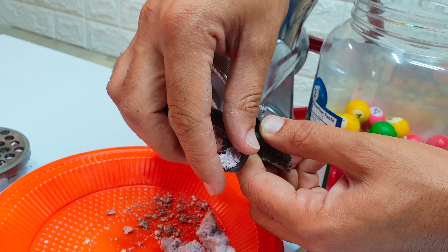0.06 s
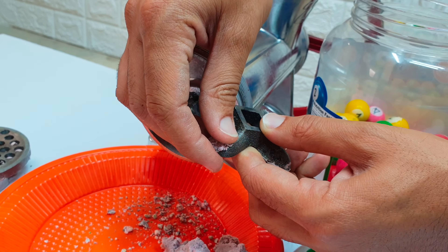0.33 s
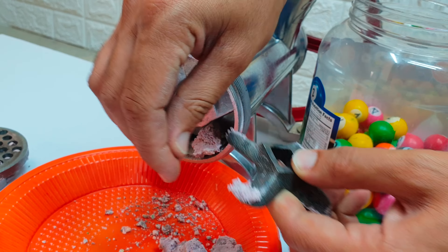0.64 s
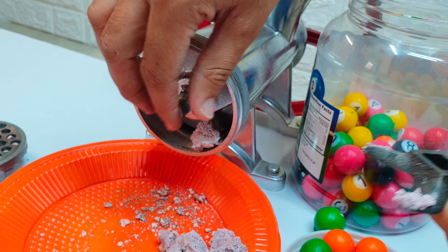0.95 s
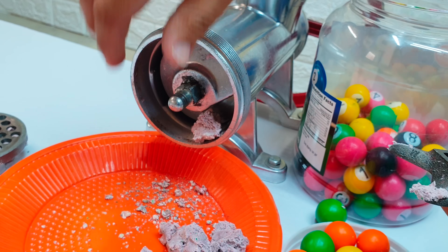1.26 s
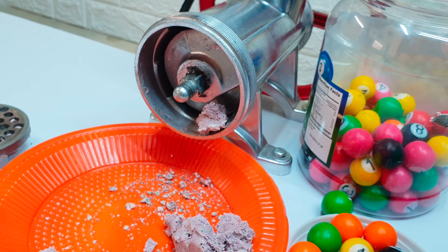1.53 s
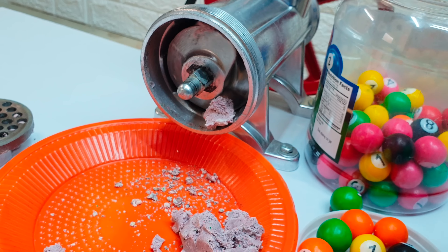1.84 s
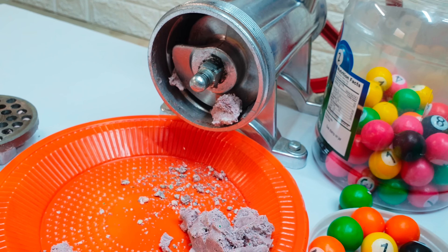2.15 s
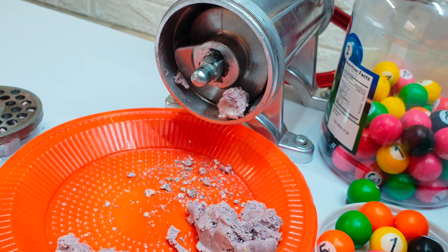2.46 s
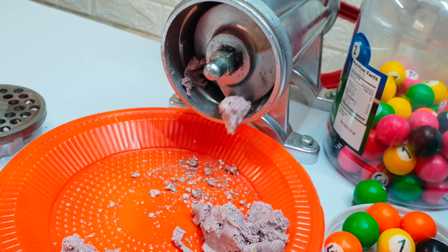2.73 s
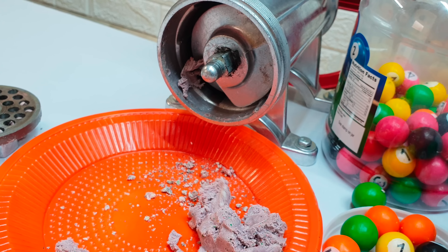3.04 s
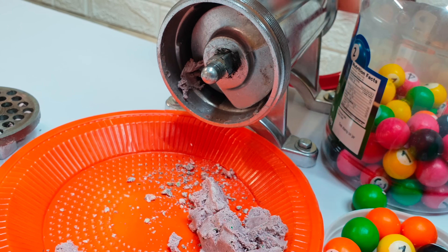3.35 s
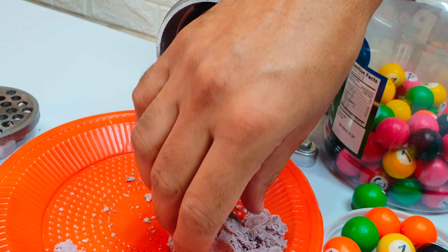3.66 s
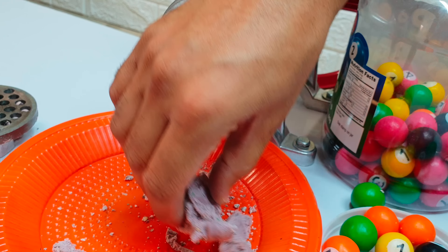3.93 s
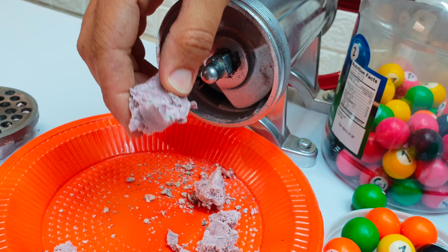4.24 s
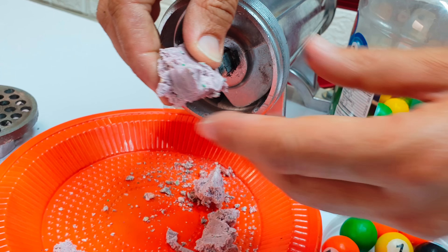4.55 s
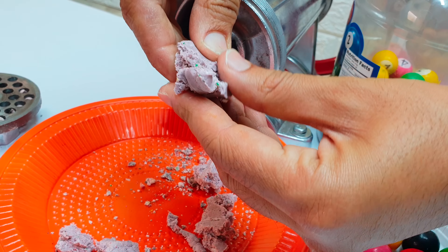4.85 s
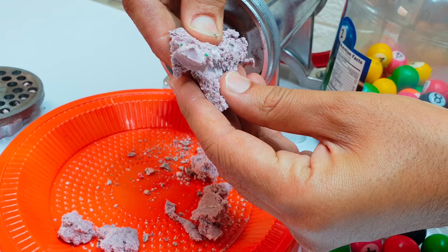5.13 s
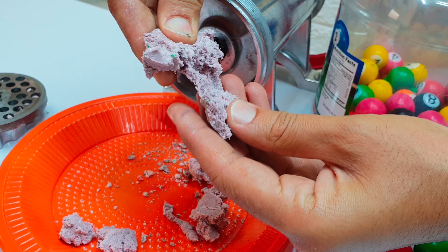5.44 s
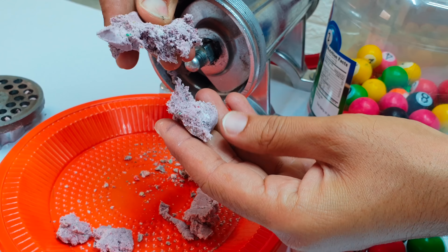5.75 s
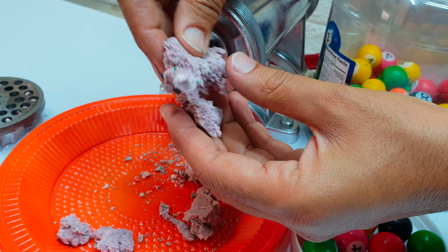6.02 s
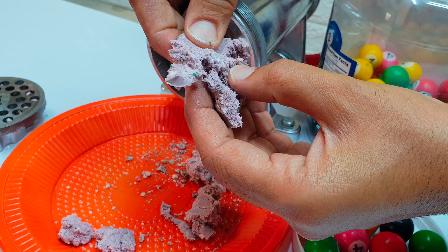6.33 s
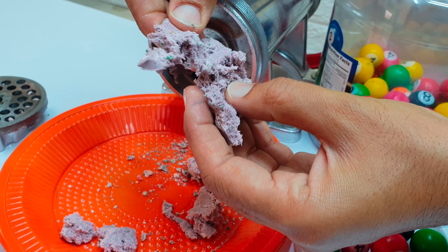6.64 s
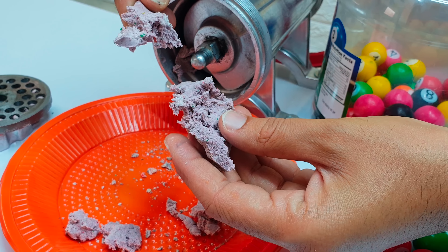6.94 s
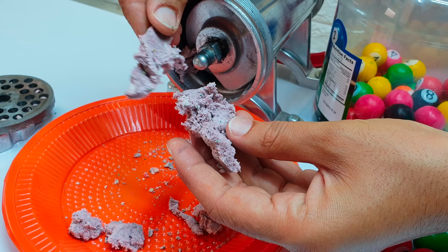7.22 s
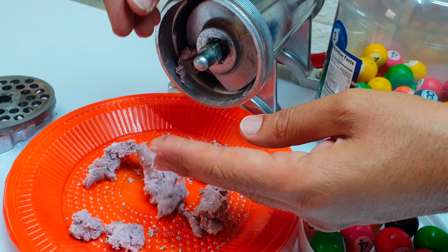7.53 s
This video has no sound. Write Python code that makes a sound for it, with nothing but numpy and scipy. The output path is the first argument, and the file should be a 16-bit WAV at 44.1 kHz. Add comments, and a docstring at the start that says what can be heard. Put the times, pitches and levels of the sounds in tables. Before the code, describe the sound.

Close up on a table in a small room, a blade ticks quietly off a hand grinder. The crank turns and steel rattles, grates and rings loudly in the hollow barrel. Two hollow knocks on a plastic plate follow, then faint snaps of sticky candy tearing and a light thud as it drops. An appliance hums softly throughout.

```python
"""A hand meat grinder has its blade pulled off and is cranked: the loose steel auger clanks and scrapes.
Fingers then knock a plastic plate while picking up soft candy, pull the sticky lump apart and drop it.
All of it happens on a table in a small hard room, with an appliance humming in the background.
The stereo microphone is close enough for direct sound to lead the room; its right port is muffled."""
import sys
import numpy as np
from scipy import signal
from scipy.fft import rfft, irfft, next_fast_len
from scipy.io import wavfile
from scipy.ndimage import map_coordinates

SR = 44100
rng = np.random.default_rng(int(sys.argv[2]) if len(sys.argv) > 2 else 0)


def generate_wav(sig):
    """Save sig (samples, or channels by samples) to the path in sys.argv[1] as 16-bit PCM at SR."""
    pcm = np.round(np.clip(np.atleast_2d(sig).T, -1, 1) * 32767).astype(np.int16)
    wavfile.write(sys.argv[1], SR, pcm)


N = 334278

# the appliance's steady tones: pitch_hz, level_db
HUM_TONES = [(96.9, -65), (193.8, -66), (484.5, -75.5), (532.9, -74.5), (775.2, -81.5), (1884, -70.5),
             (2374, -80.5), (3768, -83), (5044, -91.5), (5652, -92), (5916, -90)]
# its low drone swelling and sinking: time_s, level_db
DRONE_LEVELS = [(0.0, -47), (0.11, -48), (0.29, -64), (0.62, -51.7), (0.81, -58.5), (1.02, -47.5),
                (1.26, -62), (1.52, -52), (3.07, -56.5), (3.15, -80), (3.33, -56), (4.44, -51), (4.82, -55),
                (4.85, -81), (5.11, -63), (5.3, -55.5), (7.19, -58), (7.57, -51)]
# spectrum of the room's air: frequency_hz, relative_db
AIR_SPECTRUM = [(25, -18.5), (45, -10), (90, -15), (150, -12.5), (270, -19.5), (530, -30), (900, -31.5),
                (1400, -46.5), (1900, -32), (2150, -43), (3100, -41.5), (3750, -34.5), (4400, -48),
                (5750, -43), (7000, -63), (16000, -50.5)]
# skin and candy sliding over metal and plastic: start_s, rise_s, hold_s, level_db
FINGER_RUBS = [(0, 0.003, .02, -60.5), (0.66, 0.19, 0.19, -64.5), (2.4, .15, 0.38, -61),
               (3.42, 0.032, .01, -79.5), (3.73, 0.023, 0.23, -61.5), (4.2, .2, 0.09, -67)]
# spectrum of a rub: frequency_hz, relative_db
SKIN_SPECTRUM = [(600, -23), (2000, -7.5), (4500, -2), (6000, -8), (7500, -16), (10000, -6.5),
                 (12000, -12.5), (16000, -28)]
# the sticky blade clicking as it comes off, then candy tearing: start_s, level_db, tilt_db_per_octave
STICKY_CLICKS = [(0.052, -52, -13), (0.060, -54.5, -3), (0.099, -53, -17), (0.318, -51, -7.5),
                 (2.907, -49, 1.5), (3.126, -64.5, -10), (3.761, -48.5, -3), (3.81, -51, -0.5),
                 (3.84, -47.5, -3), (3.914, -51.5, -16), (4.013, -39.5, -0.5), (4.810, -41.5, -7),
                 (5.464, -58, -7), (5.478, -49, -1.5), (5.493, -54, -23.5), (5.8768, -56, 1),
                 (5.934, -61.5, -4), (6.087, -62.5, -4), (6.753, -52.5, 6), (7.529, -36, -2),
                 (7.547, -39, -4.5), (7.571, -37, -0.5)]
# spectrum of a click or snap: frequency_hz, relative_db
SNAP_SPECTRUM = [(300, -44.5), (900, -23), (1500, -13), (2500, -7.5), (3600, -4.5), (5000, -5), (6100, -3),
                 (7500, -15.5), (9800, -7.5), (12000, -10), (16000, -27)]
# steel grating as the blade is pulled off, then as the crank turns: start_s, rise_s, hold_s, level_db
BARREL_SCRAPES = [(0.115, 0.05, 0.038, -49), (1.68, .03, 0.18, -40), (1.91, 0.063, 0.028, -31.5),
                  (2.31, 0.072, 0.34, -51.5), (2.605, 0.028, .18, -36.5), (2.85, .05, 0.14, -58.5)]
# dense clatter of grinder and table: frequency_hz, relative_db
CLATTER_SPECTRUM = [(24, -51), (45, -7), (125, -6.5), (210, -3.5), (520, -2), (1330, -8.5), (1620, -17.5),
                    (2050, -14.5), (2900, -14), (3600, -27), (5400, -26.5), (7700, -46.5), (9900, -31.5),
                    (16000, -54)]
# resonances of the hollow barrel: centre_hz, width_hz, gain_db
BARREL_RESONANCES = [(526, 23, 4), (1360, 57, 7), (1965, 465, 5.5), (4200, 180, 11.5), (5070, 170, 4.5)]
# loose steel striking the barrel: start_s, level_db, tilt_db_per_octave, bass_db
STEEL_STRIKES = [(0.122, -44, -3.5, -26), (0.204, -48, 2, -5), (0.222, -43, -0.5, 8.5),
                 (1.697, -51, 12, 14.5), (1.720, -30, -9, 10), (1.7487, -14.5, 0.5, -4),
                 (1.758, -17, 0, -5.5), (1.8306, -13.5, 2.5, 10.5), (2.0169, -22, 0.5, -1.5),
                 (2.1219, -23.5, -1.5, -5), (2.236, -30.5, -2.5, -2.5), (2.4267, -34, -13.5, -3),
                 (2.625, -33.5, -0.5, 2), (2.633, -27.5, -0.5, 9.5), (2.680, -27, -0.5, -6),
                 (2.690, -18.5, 0, -5.5), (2.7756, -22.5, -1.5, -7), (2.8071, -23.5, -1.5, -17.5)]
# ringing modes of grinder and table: pitch_hz, relative_db, t60_s
GRINDER_MODES = [(210.5, 1.5, 0.64), (280, -7, 0.424), (331, 2, 0.55), (471, 1.5, 0.344), (532, 1, .65),
                 (667.5, 0.5, .45), (810, -6, 0.63), (964, -8, 0.34), (1170, -12.5, 0.13), (1250, -2, 0.23),
                 (1253, -4, 0.51), (1376, 0, 0.22), (1414, -6.5, 0.29), (1740, -10.5, 0.258),
                 (1840, -10.5, 0.3), (2024, 0, 0.22), (2160, -2.5, 0.2), (2400, -13.5, .35),
                 (2574, -3.5, .2), (2807, -11, 0.65), (4194, -16, 0.3), (4300, -17, 0.24),
                 (4720, -14, 0.14), (5320, -18, 0.3)]
# the table's sway under the crank's load: time_s, level_db
SWAY_LEVELS = [(1.55, -95), (1.76, -28), (1.95, -45.5), (2.55, -52), (2.68, -43.5), (3.1, -52.5),
               (3.22, -91)]
# knocks on the plate: start_s, level_db, tilt_db_per_octave, bass_db
PLATE_KNOCKS = [(3.9358, -21, 3, 13), (3.968, -31, 2.5, 6), (4.2230, -18.5, -1.4, -4.5),
                (4.2285, -19.5, 3.5, -1), (4.250, -43, 9, 5)]
# ringing modes of the plate on the table: pitch_hz, relative_db, t60_s
PLATE_MODES = [(115, -2, 0.33), (199.7, -3, 0.3), (325.2, 5.5, 0.29), (480, -3.5, 0.19), (514, -10, 0.17),
               (584, -3.5, 0.192), (693, 2, .22), (967, 3.5, 0.18), (1050, -11.5, 0.22), (1400, -18, .18),
               (1810, -5.5, 0.16), (2410, -12, .18), (6720, -32, 0.25)]
# the plate's dense rattle: frequency_hz, relative_db
PLATE_SPECTRUM = [(24, -47), (45, -27), (115, 3.5), (260, -6.5), (340, 1), (700, -1), (830, -7),
                  (990, -2.5), (2320, -15.5), (3200, -25.5), (5000, -30.5), (7600, -51), (11000, -51),
                  (16000, -63.5)]
# treble humps on that rattle: centre_hz, width_hz, gain_db
PLATE_RESONANCES = [(3500, 420, 2.9), (9500, 1400, 4.3)]
# a bump on the microphone, then the candy landing: start_s, level_db, tilt_db_per_octave, bass_db
SOFT_THUDS = [(4.672, -51.5, -10.5, 5), (7.528, -32.5, -8.5, -12), (7.545, -45.5, 4.5, -9)]
# spectrum of a thud: frequency_hz, relative_db
THUD_SPECTRUM = [(35, -25.5), (80, -11), (160, -2), (210, -3), (270, -18.5), (420, -16), (800, -26.5),
                 (1600, -21.5), (4000, -43.5)]
# the room's decay: frequency_hz, t60_s
ROOM_DECAY = [(70, 0.76), (300, 0.71), (1200, 0.57), (2500, .68), (5000, 0.4), (12000, 0.47)]
# likeness of diffuse sound at the two ports: frequency_hz, correlation
PORT_LIKENESS = [(60, 0.7), (150, 1), (300, 0.83), (640, 0.9), (1400, 0), (15000, 0.37)]
# the muffled right port: frequency_hz, below_left_db
RIGHT_PORT_LOSS = [(60, 4.5), (110, 5.5), (200, 11), (380, 11.5), (700, 22), (1300, 19), (2400, 19.5),
                   (4400, 23), (8100, 25.5), (15000, 6)]


def amp(db):
    """Decibels to gain."""
    return 10 ** (np.asarray(db) / 20)


def along(points, hz):
    """(frequency_hz, value) points read on a log axis."""
    frequencies, values = np.transpose(points)
    return np.interp(np.log(hz + 1), np.log(frequencies + 1), values)


def curve(rows):
    """(time_s, value) rows as one value per sample."""
    return np.interp(np.arange(N) / SR, *np.transpose(rows))


def wobble(rate):
    """A smooth random curve, rate knots a second."""
    knots = rng.standard_normal(int(N * rate / SR) + 4)
    return map_coordinates(knots, [np.arange(N) * rate / SR])


def tone(hz, drift_rad):
    """A sine of rms 1 whose phase wanders."""
    return np.sqrt(2) * np.sin(2 * np.pi * hz * np.arange(N) / SR + drift_rad * wobble(9.7))


def fading(t, t60_s):
    """Exponential decay, 60 dB in t60_s."""
    return np.exp(-np.log(1000) * t / t60_s)


def swells(rows, fall_db_per_s, climb_db=25.5):
    """Gain over time of movements that rise, hold and die away; overlapping ones add in power."""
    t = np.arange(N) / SR
    power = 0
    for start_s, rise_s, hold_s, level_db in rows:
        rise_db = climb_db * np.maximum(start_s + rise_s - t, 0) / rise_s
        fall_db = fall_db_per_s * np.maximum(t - start_s - rise_s - hold_s, 0)
        power += amp(np.maximum(level_db - rise_db - fall_db, -200)) ** 2
    return np.sqrt(power)


def body(spectrum, resonances=()):
    """A colour (dB against frequency): a smooth outline with resonance humps on it."""
    return lambda hz: along(spectrum, hz) + sum(
        db / (1 + (2 * (hz - centre) / width) ** 2) for centre, width, db in resonances)


def filtered(x, response):
    """x through a zero-phase filter with gain response(hz)."""
    n = x.shape[-1]
    size = next_fast_len(n + SR // 10, True)
    return irfft(rfft(x, size) * response(np.fft.rfftfreq(size, 1 / SR)), size)[..., :n]


def coloured(x, gain_db):
    """x through a causal, minimum-phase filter with gain_db(hz)."""
    size = 2 * next_fast_len(len(x), True)
    cepstrum = irfft(np.log(amp(gain_db(np.fft.rfftfreq(size, 1 / SR))) + 1e-6))
    cepstrum[1:size // 2] *= 2
    cepstrum[size // 2 + 1:] = 0
    return irfft(rfft(x, size) * np.exp(rfft(cepstrum)))[:len(x)]


def diffuse(size):
    """White noise at the two ports: alike in the bass, largely unrelated in the treble."""
    def mid_side_gains(hz):
        angle = np.arccos(np.clip(along(PORT_LIKENESS, hz), -1, 1)) / 2
        return np.array([np.cos(angle), np.sin(angle)])
    mid, side = filtered(rng.standard_normal((2, size)), mid_side_gains)
    return np.array([mid + side, mid - side])


def rush(colour, grain=1):
    """Stereo noise of rms 1, roughened by a grain envelope before it is coloured."""
    noise = filtered(diffuse(N) * grain, lambda hz: amp(colour(hz)))
    return noise / np.sqrt(np.mean(noise ** 2) + 1e-20)


def in_room(x, wet_db, build_s=0.0012, shadow_db=-5):
    """Direct sound, shadowed at the right port, plus a tail where each frequency dies at its own speed."""
    n = len(x)
    hz, t, spectra = signal.stft(diffuse(n), SR, nperseg=256)
    decay = amp(-60 * t / along(ROOM_DECAY, hz)[:, None])
    tail = signal.istft(spectra * decay, SR, nperseg=256)[1][:, :n]
    tail *= 1 - np.exp(-np.arange(n) / SR / build_s)
    reverb = signal.fftconvolve(x[None], tail / np.linalg.norm(tail[0]), axes=1)[:, :n]
    return np.array([x, amp(shadow_db) * x]) + amp(wet_db) * reverb


def unit_attack(x):
    """x scaled to rms 1 over its first 10 ms."""
    return x / np.sqrt(np.mean(x[..., :SR // 100] ** 2) + 1e-20)


def blows(rows, colour, t60_s, crack_db, wet_db, pivot_hz, modes=(), ring_db=0):
    """Each blow is a crack and a dense rattle in the body's colour, plus any modes at new strengths."""
    track = np.zeros((2, N + SR))
    t = np.arange(SR * 3 // 4) / SR
    for start_s, level_db, tilt, bass_db in rows:
        # a harder contact is brighter, a heavier one has more bass
        contact_db = lambda hz: tilt * np.log2(hz / pivot_hz + 1) + bass_db / (1 + (hz / 400) ** 2)
        force = rng.standard_normal(len(t)) * fading(t, t60_s)
        force /= np.linalg.norm(force)
        force[0] -= amp(crack_db)
        hit = coloured(force, lambda hz: colour(hz) + contact_db(hz))
        sound = in_room(unit_attack(hit), wet_db)
        if len(modes):
            hz, mode_db, mode_t60_s = np.transpose(modes)
            swing = amp(mode_db + contact_db(hz) + rng.normal(0, 2.3, len(hz)))
            swing *= rng.choice([-1, 1], len(hz))
            # low modes mostly reach both ports in step, high ones with either sign
            right_sign = np.where(rng.uniform(-1, 1, len(hz)) < along(PORT_LIKENESS, hz), 1, -1)
            partials = fading(t, mode_t60_s[:, None]) * np.sin(2 * np.pi * hz[:, None] * t)
            ring = np.array([swing, swing * right_sign]) @ partials
            sound += amp(ring_db) * unit_attack(ring)
        track[:, round(start_s * SR):][:, :len(t)] += amp(level_db) * sound
    return track[:, :N]


def appliance():
    """An appliance hums and whines in the background; its low drone wavers."""
    hum = sum(amp(db + 1.22 * wobble(5.4)) * tone(hz, drift_rad=0.22) for hz, db in HUM_TONES)
    drone = amp(curve(DRONE_LEVELS) + 0.4 * wobble(14)) * tone(145.5, drift_rad=0.6)
    return hum + drone


def room_air():
    """Room tone: a faint, steady, bass-heavy rush from all around the microphone."""
    return amp(-59) * rush(body(AIR_SPECTRUM))


def finger_rubs():
    """Skin and candy slide over metal and plastic with a soft, grainy hiss."""
    grain = amp(1.54 * wobble(270))
    return swells(FINGER_RUBS, fall_db_per_s=128) * rush(body(SKIN_SPECTRUM), grain)


def sticky_clicks(gap_s=0.016, loss_db=10, fall_db_per_s=108.5):
    """The sticky blade clicks coming off, then candy snaps as it tears; two weaker ticks follow each."""
    snaps = []
    for start_s, level_db, tilt in STICKY_CLICKS:
        snaps.append((start_s, level_db, tilt, 0))
        for wait_s in np.cumsum(gap_s * rng.uniform(0.5, 1.5, 2)):
            snaps.append((start_s + wait_s, level_db - loss_db - fall_db_per_s * wait_s, tilt, 0))
    crisp = body(SNAP_SPECTRUM, resonances=[(4840, 650, 4.9)])
    return blows(snaps, crisp, t60_s=0.024, crack_db=-1.5, wet_db=-3.5, pivot_hz=2000)


def table_sway(kick_db=-19.5, rise_s=0.04):
    """The crank's load sways the table at its lowest resonance, and every clank kicks it."""
    kicks = [(start_s - rise_s / 2, rise_s, 0, db + kick_db) for start_s, db, *_ in STEEL_STRIKES]
    envelope = np.hypot(swells(kicks, fall_db_per_s=126), amp(curve(SWAY_LEVELS)))
    return envelope * tone(77.5, drift_rad=1.1)


def barrel_scrapes():
    """Steel grates in the hollow barrel as the blade is pulled off, then as the crank turns."""
    grain = amp(2.7 * wobble(150) + 2.5 * wobble(22))
    grating = rush(body(CLATTER_SPECTRUM, BARREL_RESONANCES), grain)
    return swells(BARREL_SCRAPES, fall_db_per_s=88.5) * grating


def steel_clanks():
    """Loose steel strikes the barrel; grinder and table ring."""
    steel = body(CLATTER_SPECTRUM, BARREL_RESONANCES)
    return blows(STEEL_STRIKES, steel, t60_s=0.08, crack_db=-4.5, wet_db=-3, pivot_hz=503,
                 modes=GRINDER_MODES, ring_db=-6)


def plate_claps():
    """Knocked by the fingers, the thin plastic plate claps against the table and rings briefly."""
    plastic = body(PLATE_SPECTRUM, PLATE_RESONANCES)
    return blows(PLATE_KNOCKS, plastic, t60_s=0.03, crack_db=-4.5, wet_db=-3.5, pivot_hz=400,
                 modes=PLATE_MODES, ring_db=-7)


def soft_thuds():
    """A dull handling bump on the microphone, then the soft candy lump landing."""
    return blows(SOFT_THUDS, body(THUD_SPECTRUM), t60_s=0.066, crack_db=-1.5, wet_db=2, pivot_hz=80)


def scene():
    """The table and the room around it, as they reach the microphone."""
    grinder = steel_clanks() + barrel_scrapes() + table_sway()
    handling = plate_claps() + soft_thuds() + sticky_clicks() + finger_rubs()
    return grinder + handling + appliance() + room_air()


def record(dry, top_hz=16200):
    """The microphone: its right port is muffled, which also delays it; faint hiss and a band limit."""
    loss_db = lambda hz: along(RIGHT_PORT_LOSS, hz)
    # lift both ports so that their gains average 1 once the right is muffled
    left, right = filtered(dry, lambda hz: 2 / (1 + amp(-loss_db(hz))))
    right = coloured(right, lambda hz: -loss_db(hz))
    hiss = amp(-77) * rng.standard_normal((2, N))
    heard = np.clip(np.array([left, right]) + hiss, -1, 1)
    return filtered(heard, lambda hz: hz < top_hz)


dry = scene()
out = record(dry)
generate_wav(out)
```